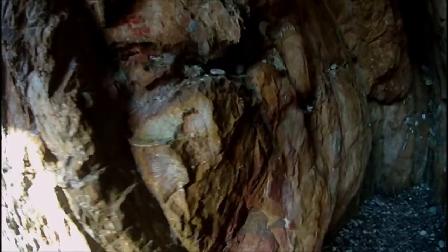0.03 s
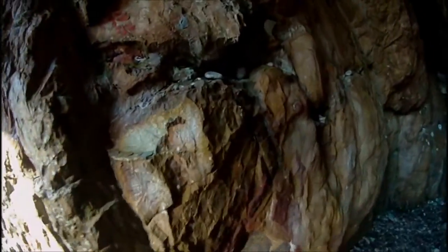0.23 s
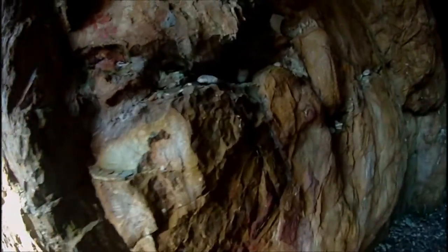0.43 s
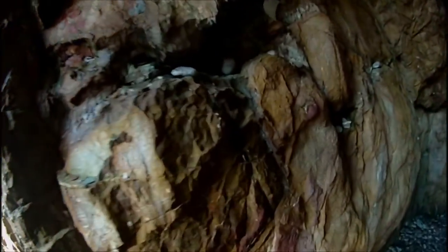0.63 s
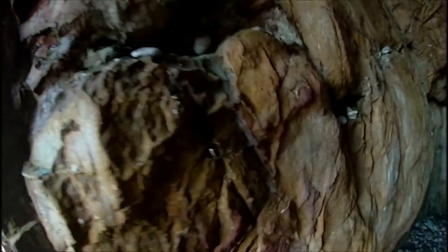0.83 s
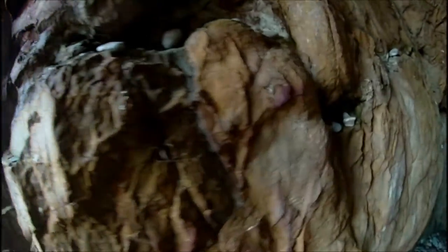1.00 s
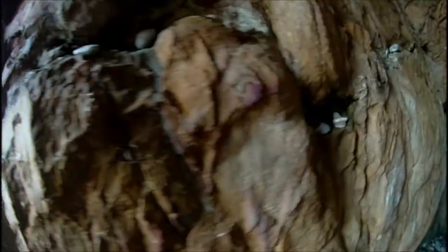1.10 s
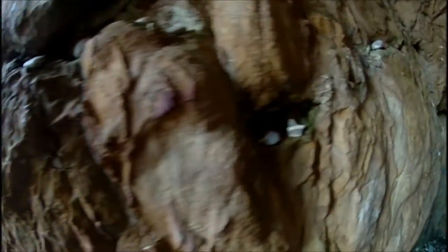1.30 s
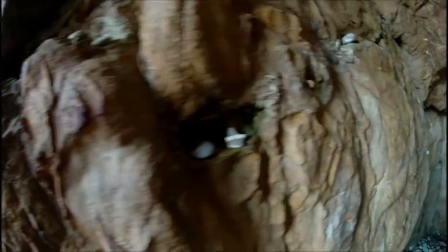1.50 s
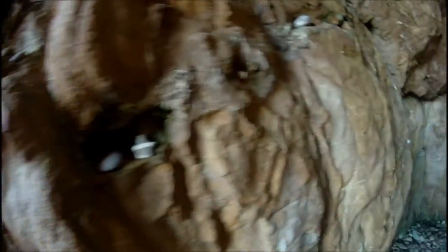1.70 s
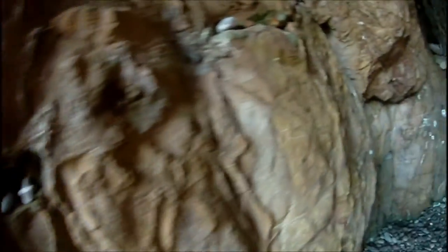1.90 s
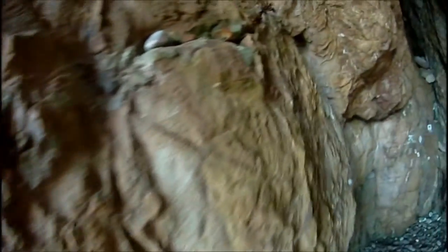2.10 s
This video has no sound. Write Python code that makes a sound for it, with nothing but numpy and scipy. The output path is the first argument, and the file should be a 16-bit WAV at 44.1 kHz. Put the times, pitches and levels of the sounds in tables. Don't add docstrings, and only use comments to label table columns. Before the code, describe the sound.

Someone takes three unhurried steps over pebbles in a cave, the second lighter and the third hardest. Stones clack and grind, the sole thuds dully, distant surf washes quietly; near-mono small microphone with crisp upper mids.

```python
import sys
import numpy as np
from scipy import signal
from scipy.fft import rfft, irfft, next_fast_len
from scipy.io import wavfile
from scipy.ndimage import uniform_filter1d, map_coordinates

SR = 44100
rng = np.random.default_rng(int(sys.argv[2]) if len(sys.argv) > 2 else 0)


def store_wav(level_fs):
    pcm = np.round(np.clip(np.atleast_2d(level_fs), -1, 1) * 32767)
    wavfile.write(sys.argv[1], SR, pcm.T.astype(np.int16))


def volts_from_db(level):
    exponent = np.asarray(level, float) / 20
    return 10 ** exponent


N = 97020


def unit(x):
    return x / np.sqrt(np.mean(x ** 2) + 1e-20)


def along(points, hz):
    f, values = np.transpose(points)
    return np.interp(np.log(hz + 1), np.log(f + 1), values)


def wobble(rate):
    return map_coordinates(rng.standard_normal(1000), [np.arange(N) * rate / SR])


def filtered(x, response):
    m = next_fast_len(N + 8192)
    return irfft(rfft(x, m) * response(np.fft.rfftfreq(m, 1 / SR)), m)[..., :N]


def surf():
    # f/Hz, level/dB
    surf_spectrum = [(60, -19.5), (200, -17.5), (550, -8), (1200, -6), (2800, -8.5), (6100, -11.5),
                     (7600, -24.5), (15500, -30)]
    z = signal.stft(rng.standard_normal(N), nperseg=512)[2]
    patches = uniform_filter1d(rng.standard_normal(z.shape), 8, 0)
    patches = uniform_filter1d(patches, 16, 1)
    wash = signal.istft(z * volts_from_db(1.28 * unit(patches)), nperseg=512)[1][:N]
    wash = unit(filtered(wash, lambda hz: volts_from_db(along(surf_spectrum, hz))))
    swell_db = 0.74 * wobble(1.34)
    return volts_from_db(-57.5 + swell_db) * wash


def control(column, rest):
    # t/s, pressure level/dB, fine stone level/dB
    heels = [
        [(.15, -78, 2), (.172, -52, -12), (.201, -54, -8), (.206, -43, -9), (.216, -35, 2), (.255, -30, 0.5),
         (.28, -36, -3), (.305, -44, -2), (.355, -55, 5)],
        [(.968, -79, 2), (.978, -57, -3), (.992, -44, 1), (1.03, -50.5, 0), (1.045, -45.5, -7.5),
         (1.06, -50, 7), (1.12, -47, 5), (1.15, -50, 3), (1.172, -60, 2.5)],
        [(1.64, -87, 0), (1.649, -42, 3), (1.668, -37.5, 3.5), (1.693, -43, 12), (1.70, -34.5, 11),
         (1.72, -34, 5), (1.76, -43.5, 6.5), (1.79, -46, 2), (1.85, -56, -2)],
    ]
    # t/s, pressure level/dB, fine stone level/dB
    toes = [
        [(.355, -58, -11), (.38, -48, 1), (.39, -45.5, 12), (.415, -50, 9), (.445, -58, 9), (.475, -64, 8),
         (.52, -75, -17)],
        [(1.172, -52, 11), (1.2, -52, 5), (1.25, -49.5, -5), (1.28, -60, 0), (1.33, -74, 0)],
        [(1.85, -58, -2), (1.87, -48, 0), (1.898, -47.5, 1), (1.904, -42.5, -1), (1.935, -46.5, -3),
         (1.98, -55, -2), (2.05, -69, -10)],
    ]
    out, t = np.full(N, rest, float), np.arange(N) / SR
    for step in heels + toes:
        rows = np.array(step)
        inside = (t >= rows[0, 0]) & (t <= rows[-1, 0])
        out[inside] = np.interp(t[inside], rows[:, 0], rows[:, column])
    return out


def grains(per_s, size_db):
    chance, sign, size = rng.random((N, 3)).T
    hit = chance < per_s / SR
    return unit(hit * np.sign(sign - .5) * volts_from_db(-size_db * np.log(size + .03)))


def stones(clump):
    contacts_per_s, size_db, sharpness_q = 500, 6, 4.8
    out = np.zeros(N)
    for hz in np.geomspace(700, 15000, 24):
        ring = signal.iirpeak(hz, sharpness_q, fs=SR)
        out += unit(signal.lfilter(*ring, grains(contacts_per_s, size_db))) * np.sqrt(hz)
    return out * clump


def coloured(x, spectrum):
    cepstrum = irfft(np.log(volts_from_db(along(spectrum, np.fft.rfftfreq(4096, 1 / SR))) + 1e-6))
    causal = np.r_[cepstrum[0], 2 * cepstrum[1:2048], np.zeros(2048)]
    impulse = irfft(np.exp(rfft(causal)))[:2048]
    return signal.fftconvolve(x, impulse)[:N]


def shingle():
    # f/Hz, level/dB
    grit_spectrum = [(500, -30), (1000, -28), (2200, -12), (3800, -5), (5100, -1), (6300, -3), (7400, -12),
                     (15500, -35.5)]
    # f/Hz, level/dB
    grind_spectrum = [(60, -28.5), (120, -11.5), (300, -3), (700, -1.5), (1500, -2.5), (3000, -9),
                      (6000, -61)]
    pressure_db, fine_db = control(column=1, rest=-90), control(column=2, rest=0)

    clump = volts_from_db(-0.23 * wobble(220))
    grit = unit(coloured(stones(clump), grit_spectrum))
    top = filtered(grit, lambda hz: 1 / (1 + (8000 / (hz + 1)) ** 8))
    clicks = grit + (volts_from_db(fine_db) - 1) * top

    shifting = grains(per_s=1100, size_db=3.0) * volts_from_db(3.2 * wobble(40.54))
    grind = unit(coloured(shifting, grind_spectrum))
    grind_db = np.where(pressure_db > -85, -59.5 + 0.45 * (pressure_db + 45), -120)
    return volts_from_db(pressure_db) * clicks + volts_from_db(grind_db) * grind


def thuds():
    # t/s, peak level/dB, f/Hz
    settlings = [(0.169, -45.5, 710), (0.242, -56, 150), (.25, -58, 590), (0.291, -59, 248),
                 (0.383, -44.5, 427), (1.02, -50.5, 1130), (1.075, -38.5, 1270), (1.055, -50, 240),
                 (1.09, -49, 171), (1.11, -47, 826), (1.495, -46, 537), (1.643, -44.5, 376),
                 (1.662, -47, 149), (1.699, -51, 300), (1.775, -58, 490), (1.789, -54, 151),
                 (1.915, -48.5, 280)]
    push_t60, puff_t60, rise_s = .012, 0.11, 0.0019
    out, t = np.zeros(N + SR), np.arange(5000) / SR
    for s, db, hz in settlings:
        push = .5 * np.sin(2 * np.pi * hz * t) * volts_from_db(-60 * t / push_t60)
        band = signal.butter(2, (max(.5 * hz, 95), 2.18 * hz), "band", fs=SR)
        puff = unit(signal.lfilter(*band, rng.standard_normal(len(t)))) * volts_from_db(-60 * t / puff_t60)
        thud = (push + puff) * (1 - np.exp(-t / rise_s))
        out[round(s * SR):][:len(t)] += volts_from_db(db - 5) * thud
    return out[:N]


def clacks():
    # t/s, peak level/dB,
    # f/Hz, ring t60/s
    pebbles = [(0.17, -51, 1110, .006), (.2036, -22, 3520, 0.039), (.2137, -17.5, 3650, 0.017),
               (.2377, -12, 5120, 0.0096), (0.2524, -17, 5310, 0.016), (0.27, -14.5, 4940, 0.012),
               (.2876, -21.5, 4900, 0.027), (.9797, -37, 5430, .004), (0.9837, -45, 6540, .004),
               (.9897, -24, 5030, 0.0085), (.998, -27.5, 4120, 0.018), (1.024, -32, 3250, 0.011),
               (1.07, -28.5, 6100, 0.022), (1.182, -45.5, 10350, 0.0085), (1.6542, -25.5, 6130, 0.0094),
               (1.6535, -35, 9400, .006), (1.667, -28, 4400, .015), (1.6961, -9, 5500, 0.0054),
               (1.6966, -24.5, 10400, .008), (1.7058, -23, 5900, 0.012), (1.7114, -14, 6330, 0.024),
               (1.7241, -13, 5880, 0.023), (1.732, -14, 5770, 0.028), (1.743, -24, 5100, 0.0087),
               (1.8675, -36.5, 5280, 0.012), (1.9008, -27.5, 3220, 0.013), (1.913, -31, 3440, 0.0092),
               (1.9209, -37, 5840, 0.0062), (1.93, -33.5, 3650, 0.011)]
    modes = [(1, 0), (1.37, -12), (.76, -12)]
    crack_t60, ring_db, ring_rise_s = 0.0072, -12.5, 0.00034
    out, t = np.zeros(N + SR), np.arange(3000) / SR
    for s, db, hz, t60 in pebbles:
        ring = np.zeros(len(t))
        for ratio, level in modes:
            mode_db = level + 2 * rng.standard_normal() - 60 * t / t60
            ring += volts_from_db(mode_db) * np.sin(2 * np.pi * hz * ratio * t)
        ring *= 1 - np.exp(-t / ring_rise_s)

        chips = np.sin(2 * np.pi * hz * t) + 1.15 * rng.standard_normal(len(t))
        chips *= volts_from_db(-60 * t / crack_t60)
        band = signal.butter(1, (0.78 * hz, min(0.99 * hz, 14000)), "band", fs=SR)
        lowpass = signal.butter(4, max(7500, 1.65 * hz), fs=SR)
        crack = signal.lfilter(*lowpass, signal.lfilter(*band, chips))
        crack = 0.66 * crack / abs(crack).max()
        out[round(s * SR):][:len(t)] += volts_from_db(db) * (volts_from_db(ring_db) * ring + crack)
    return out[:N]


def cave(x):
    # f/Hz, t60/s
    decay = [(200, 0.35), (2000, 0.28), (6000, 0.19), (14000, 0.045)]
    out = np.zeros(N + SR)
    for k in range(0, N, 4410):
        hz, t, z = signal.stft(rng.standard_normal(SR // 2), SR, nperseg=256)
        fade = volts_from_db(-60 * t / along(decay, hz)[:, None])
        tail = signal.istft(z * fade, SR, nperseg=256)[1]
        wet = signal.fftconvolve(x[k:k + 4410], tail / np.linalg.norm(tail))
        out[k + 90:][:len(wet)] += wet
    return out[:N]


def scene():
    wash = surf()
    feet = shingle() + thuds() + clacks()
    mono = wash + volts_from_db(-2.0) * feet + volts_from_db(-7.5) * cave(feet)
    return np.array([mono, mono])


def top_cut(x):
    return signal.sosfilt(signal.butter(12, 15770, fs=SR, output="sos"), x)


def record(dry):
    top_hz, right_cut_hz, hiss_db = 15350, 116, -73
    hiss = volts_from_db(hiss_db) * rng.standard_normal((2, N))
    left, right = filtered(dry + hiss, lambda hz: hz < top_hz)
    right = filtered(right, lambda hz: 1j * hz / (right_cut_hz + 1j * hz))
    left = left - .00214
    return top_cut(np.array([left, right]))


dry = scene()
out = record(dry)
store_wav(out)
```